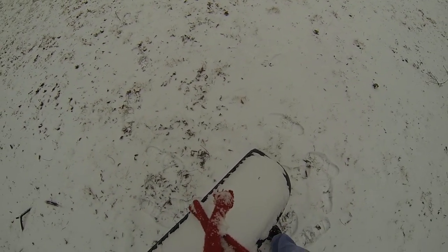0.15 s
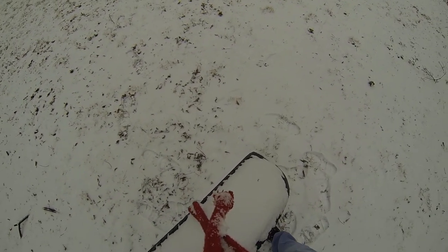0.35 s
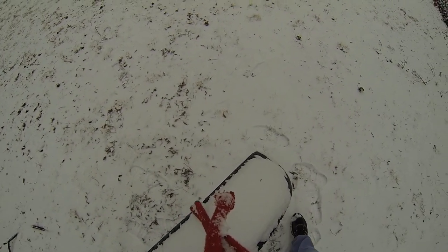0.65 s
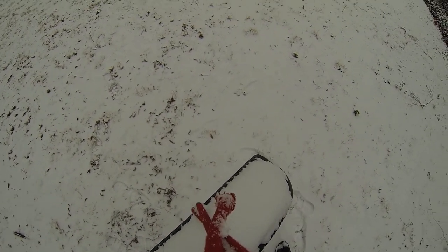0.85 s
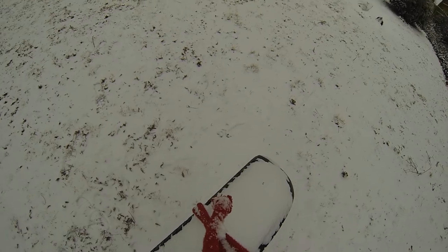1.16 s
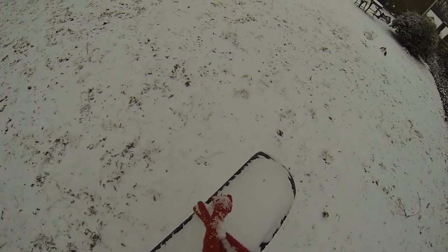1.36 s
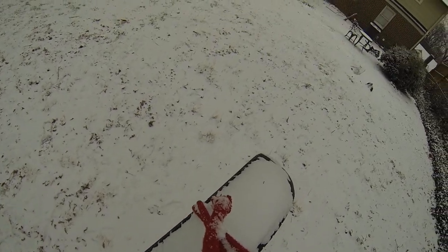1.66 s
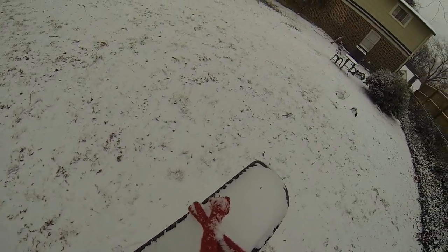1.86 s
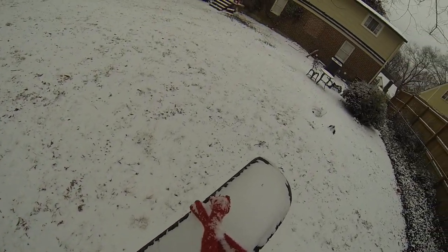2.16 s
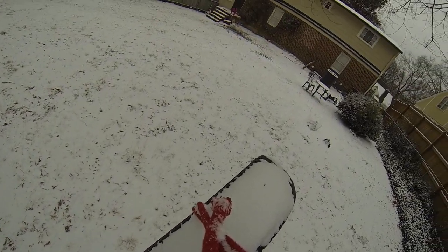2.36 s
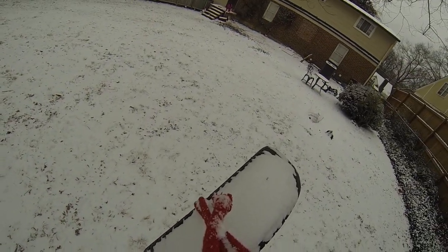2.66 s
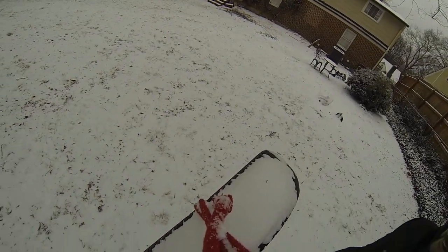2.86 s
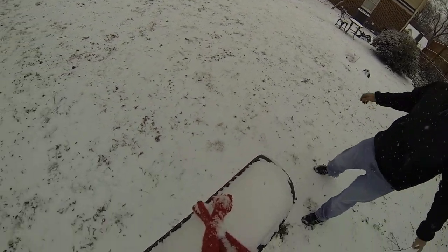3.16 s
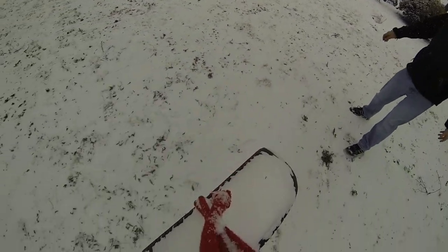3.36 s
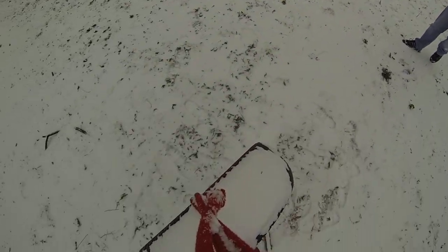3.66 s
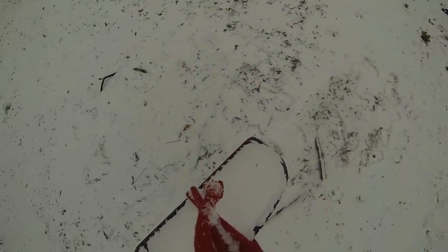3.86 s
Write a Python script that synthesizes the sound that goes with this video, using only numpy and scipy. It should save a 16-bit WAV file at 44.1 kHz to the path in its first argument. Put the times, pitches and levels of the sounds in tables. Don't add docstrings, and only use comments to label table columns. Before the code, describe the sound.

Low muffled bumps and rumble of a board in a snowy yard, heard by a closed-in camera microphone riding on it; a sharp early tick, near quiet, a mid surge, then louder thuds at the end.

```python
import sys
import numpy as np
from scipy import signal
from scipy.fft import rfft, irfft
from scipy.io import wavfile
from scipy.ndimage import uniform_filter1d

SR = 44100
rng = np.random.default_rng(int(sys.argv[2]) if len(sys.argv) > 2 else 0)


def invert_db(level):
    return 10 ** (np.asarray(level, dtype=float) / 20)


def digitize_waveform(pressure):
    field = np.atleast_2d(pressure).T
    bounded = np.clip(field, -1, 1)
    quanta = np.round(bounded * 32767).astype(np.int16)
    wavfile.write(sys.argv[1], SR, quanta)


N = 176400
PORT_HZ = 2020


def unit(x):
    return x / np.sqrt(np.mean(x ** 2))


def resonate(x, peaks):
    out = np.zeros(len(x))
    for k, (hz, width_hz, db) in enumerate(peaks):
        b, a = signal.iirpeak(hz, hz / width_hz, SR)
        out += (-1) ** k * invert_db(db) * signal.lfilter(b, a, x)
    return out


def muffle(x, hz):
    return signal.lfilter(*signal.butter(2, hz, fs=SR), x)


def colour(points):
    hz, db = np.array(points).T
    log_f = np.log(np.maximum(np.arange(N // 2 + 1) * SR / N, 8))
    gain = invert_db(np.interp(log_f, np.log(hz), db, right=-90))
    return unit(irfft(rfft(rng.standard_normal(N)) * gain, N))


def walk(rate_hz):
    hold = int(SR / rate_hz)
    steps = np.repeat(rng.standard_normal(N // hold + 1), hold)
    return unit(uniform_filter1d(uniform_filter1d(steps, hold), hold)[:N])


def decay(t, t60_s):
    return np.exp(-np.log(1000) * t / t60_s)


def ring(modes, t, chance, tilt_db=0, scatter_db=4.5, spread=0.061):
    hz, db, t60_s = np.array(modes).T[:, :, None]
    weigh, detune = chance[:len(hz), None], chance[8:8 + len(hz), None]
    level_db = db + tilt_db * np.log2(hz / hz[1]) + scatter_db * weigh
    gain = np.sign(weigh * detune) * invert_db(level_db)
    tone = np.sin(2 * np.pi * hz * (1 + spread * detune) * t)
    return np.sum(gain * decay(t, t60_s) * tone, axis=0)


def add(out, s, x):
    i = int(s * SR)
    out[i:i + len(x)] += x[:N - i]


def motion(column):
    # t/s, rush level/dB, grit re rush/dB, shake level/dB
    moves = [(0, -63, -17, -57.5), (.78, -64, -18, -55.5), (1.12, -49, -18.5, -55.5),
             (1.3, -45, -15.5, -56), (1.47, -44.5, -18, -48.5), (1.52, -55, -27, -38),
             (1.8, -50, -19.5, -38.5), (1.949, -42.5, -25, -21.5), (2.25, -53, -22, -35),
             (2.62, -53, -25, -37), (2.68, -56.5, -20, -56.5), (2.9, -48, -27.5, -48.5),
             (3.15, -37, -24.5, -38), (3.38, -42, -20.5, -38), (3.5, -36.5, -29.5, -23.5),
             (3.75, -41, -17, -31.5), (4, -43, -16, -29.5)]
    points = np.array(moves)
    return np.interp(np.arange(N) / SR, points[:, 0], points[:, column])


def recorder_hiss():
    # f/Hz, density/dB
    hiss_spectrum = [(200, 6.5), (600, 8), (2000, -1), (3200, 3.5), (5000, -2), (7500, -6.5), (13000, -9),
                     (15700, -20)]
    # f/Hz, width/Hz, level/dB
    whines = [(9850, 450, 6.5), (12650, 40, 1.5), (13130, 60, 1.5)]
    hiss = colour(hiss_spectrum) + invert_db(-8.5) * resonate(rng.standard_normal(N), whines)
    return invert_db(-69 + 0.48 * walk(6.6)) * hiss


def rush():
    # f/Hz, width/Hz, level/dB
    housing = [(135, 33, 3), (371.3, 29, -4.5), (710, 920, -14.5), (1242, 268, -1), (1375, 108, 5.24),
               (1569, 200, 2.36), (1950, 620, -17)]
    # f/Hz, width/Hz, level/dB
    grit_peaks = [(2310, 380, 5.5), (3370, 370, 1.5), (3670, 550, -1.7), (4710, 300, -0.5),
                  (5400, 900, -11)]
    grains_per_s, scatter_db, grain_db, grain_cap = 900, 4.0, -2, 3
    swell_db, flicker_db = 1.2, 2

    hit = rng.random(N) < grains_per_s / SR
    size = np.minimum(rng.exponential(size=N), grain_cap)
    grains = unit(hit * rng.standard_normal(N) * invert_db(scatter_db * size))
    drive = rng.standard_normal(N) + invert_db(grain_db) * grains
    shared = walk(16.)

    air_drive = drive * invert_db(swell_db * shared + flicker_db * walk(40.))
    air = unit(muffle(resonate(air_drive, housing), PORT_HZ))

    grit_drive = (drive + .6 * grains) * invert_db(1.8 * shared + 2.3 * walk(45.))
    grit = resonate(resonate(grit_drive, grit_peaks), [(3500, 5200, 0)])
    grit = unit(muffle(grit, 5200))
    return invert_db(motion(column=1) + 2.5) * (air + invert_db(motion(column=2)) * grit)


def shake():
    # f/Hz, level/dB
    tremor = [(20, 5.5), (40, -2.8), (65, 0.5), (140, -8.5), (210, -17.5), (290, -31.5), (400, -25),
              (900, -35.5)]
    surge_db = 2.5
    return invert_db(motion(column=3) + 3.5) * unit(colour(tremor) * invert_db(surge_db * walk(14.)))


def ticks():
    # t/s, level/dB, treble re shell/dB, body re shell/dB
    tick_events = [(.137, -55, -18, 6), (0.3565, -18, -16, -10.5), (.3934, -48, -9.5, -12),
                   (0.3975, -38, -15, -11), (0.4206, -44.5, -12.5, -11), (.4476, -49.5, -14.5, -9),
                   (1.2242, -47, -24.5, -1), (1.249, -52, -7, -8), (1.2633, -45, -12, -8),
                   (1.2762, -30, -12, -14), (1.349, -44.5, -24.5, 1.5), (1.4222, -36.5, -14.5, -3),
                   (1.8, -48, -30, 1.5), (1.9047, -43.5, -28.5, 2), (1.926, -27.5, -27, 9.5),
                   (1.9342, -34.5, -31, 3), (2.0401, -38.5, -17.5, -6), (2.177, -50, -29, -3),
                   (2.286, -47, -17, -2), (2.3044, -50, -19.5, -3), (3.044, -34, -45, -4),
                   (3.0732, -32.5, -27.5, 3), (3.1867, -43, -36, -3.5), (3.6408, -35, -32, 3.5),
                   (3.754, -34, -23.5, 1.5), (3.803, -37, -18, 2), (3.8432, -33, -18, 5),
                   (3.8526, -42.5, -7.5, 1), (3.898, -31.5, -18, 15), (3.909, -26, -23, 6.5)]
    # f/Hz, level/dB, t60/s
    shell_modes = [(2540, -4, 0.0093), (3160, -3, 0.011), (3750, -2.2, 0.0086), (4620, -3.7, 0.0085),
                   (5600, -6, 0.0048)]
    # f/Hz, level/dB, t60/s
    treble_modes = [(6800, -3.5, 0.0058), (8100, -2.5, .004), (9600, 2, 0.0042), (11100, -5, 0.0032),
                    (12700, -6, 0.0045), (14600, -9, .003)]
    # f/Hz, level/dB, t60/s
    body_modes = [(1374, 0.5, .016), (1550, -1.6, 0.016), (1960, -7.5, 0.011)]
    tick_db = -0.64

    out, t = np.zeros(N), np.arange(SR // 20) / SR
    chances = rng.standard_normal((len(tick_events), 180))
    for (s, db, treble_db, body_db), c in zip(tick_events, chances):
        crack = .16 * c[48:] * np.exp(-np.arange(132) / 58.0)
        crack[0] = 1
        layers = (ring(shell_modes, t, c[:16], scatter_db=1.6, spread=0.026),
                  ring(treble_modes, t, c[16:32]),
                  ring(body_modes, t, c[32:48], scatter_db=2.1, spread=.02))
        cracked = [np.convolve(layer, crack) for layer in layers]
        shell, treble, body = [x / np.abs(x).max() for x in cracked]
        add(out, s, invert_db(db + tick_db) * (shell + invert_db(treble_db + 8) * treble + invert_db(body_db) * body))
    return signal.lfilter(*signal.butter(2, 950, "high", fs=SR), out)


def bumps():
    # t/s, level/dB, rattle re bump/dB, stiffness/0-1
    bump_events = [(0.278, -40, -27, 0.34), (0.297, -34.5, -18, 0.5), (0.395, -36, -23, 0.23),
                   (0.869, -43, -12, 0.8), (0.915, -42.5, -3, 0.4), (1.069, -42.5, 3.5, 0.45),
                   (1.284, -16, -16, 0.31), (1.308, -22.5, -21, 0.15), (1.551, -26.5, -18, 0.42),
                   (1.588, -31, -20, 0.3), (1.647, -24, -29, 0.67), (1.744, -18.5, -15.5, 0.7),
                   (1.819, -22.5, -4.5, 0.96), (1.866, -7.5, -15.5, 0.52), (1.914, -8.5, -18, 0.5),
                   (1.944, -9.5, -19, 0.37), (1.979, -17, -24, 0.87), (2.014, -22.5, -7.5, 0.76),
                   (2.112, -12, -21, 0.52), (2.199, -37.5, -9, 0.7), (2.301, -21, -15.5, 0.26),
                   (2.359, -29, -13, 0.74), (2.45, -41, -18, 0.3), (2.551, -28, -13.5, 0.87),
                   (2.618, -30, -35, 0.7),
                   (3.081, -37, -0.5, 0.58), (3.129, -30, -2, 0.89), (3.214, -20.5, -12.5, 0.84),
            (3.339, -23, -6, 0.45), (3.425, -16.5, -16, 0.86), (3.44, -9.5, -12.5, 0.61),
            (3.489, -6, -17.5, 0.41), (3.509, -6.5, -13.5, 0.46), (3.56, -8, -18, 0.39),
            (3.594, -13, -23.5, 0.36), (3.642, -3.5, -12, 0.47), (3.686, -5.5, -21, 0.21),
            (3.79, -2, -11.5, 0.45), (3.829, -1, -30, 0.36), (3.933, -10, -28.5, 0.7),
            (3.947, -4, -12.5, 0.42), (3.974, -3.5, -24.5, 0.54)]
    # f/Hz, level/dB, t60/s
    board_modes = [(37.9, -3, 0.17), (60.6, -2, 0.21), (94.4, -5, 0.17), (129.1, -2.5, 0.16),
                   (166, -7.5, 0.098), (224.5, -13, 0.086), (370, -19, 0.1), (550, -17.5, .05)]
    push_s, rise_s, rattle_t60_s, knock_t60_s = 0.0029, 0.0016, 0.058, .08
    bump_db, rattle_gain_db, knock_db = -1.5, 3.5, -15

    low, rattle, knock = np.zeros((3, N))
    t = np.arange(SR // 2) / SR
    push = np.hanning(max(int(push_s * SR), 3))
    rise = 1 - np.exp(-t / rise_s)
    rows = bump_events
    chances = rng.standard_normal((len(rows), 16))
    for (s, db, rattle_db, stiff), chance in zip(rows, chances):
        modes = ring(board_modes, t, chance, tilt_db=18 * (stiff - .5), scatter_db=2.24)
        x = signal.fftconvolve(modes, push)
        add(low, s, invert_db(db + bump_db) * x / np.abs(x).max())
        add(rattle, s, invert_db(db + rattle_db + rattle_gain_db) * rise * decay(t, rattle_t60_s))
        add(knock, s, invert_db(db + knock_db + 14 * (stiff - 1.0)) * rise * decay(t, knock_t60_s))

    buzz = resonate(rattle * rng.standard_normal(N), [(1430, 250, 15.9), (840, 1050, 2.1)])
    thud = resonate(knock * rng.standard_normal(N),
                    [(236, 102.6, 19.05), (391, 145, 20.7), (640, 155, 14.1)])
    return low + muffle(buzz, PORT_HZ) + thud


def scene():
    return (recorder_hiss() + rush() + shake() + ticks() + bumps())[None]


def band_limit(x):
    return signal.sosfilt(signal.butter(12, 15300, fs=SR, output="sos"), x)


def record(dry):
    low_cut_hz, ceiling = 20.3, 2.3
    x = signal.lfilter(*signal.butter(2, low_cut_hz, "high", fs=SR), dry)
    mix = ceiling * np.tanh(x / ceiling)
    return band_limit(mix)


dry = scene()
out = record(dry)
digitize_waveform(out)
```